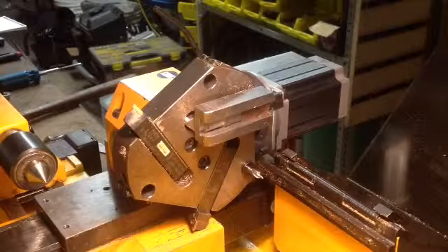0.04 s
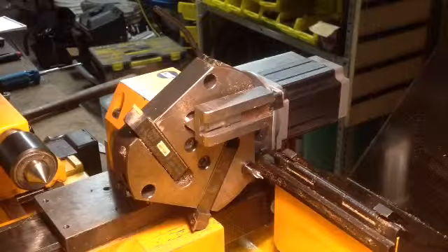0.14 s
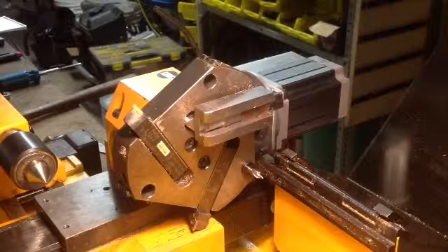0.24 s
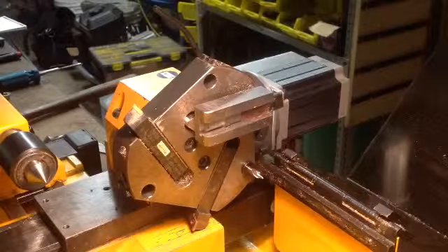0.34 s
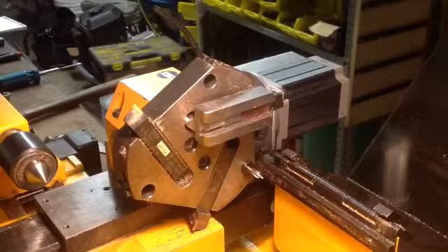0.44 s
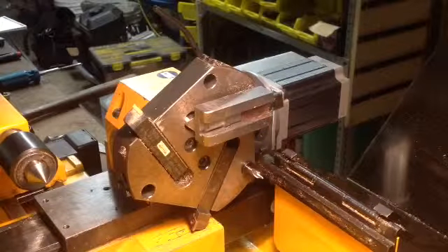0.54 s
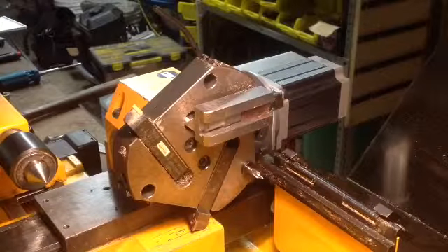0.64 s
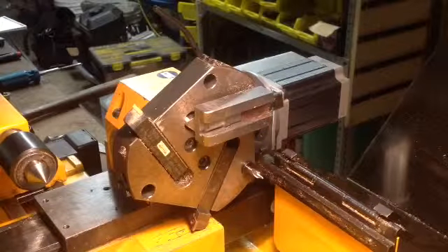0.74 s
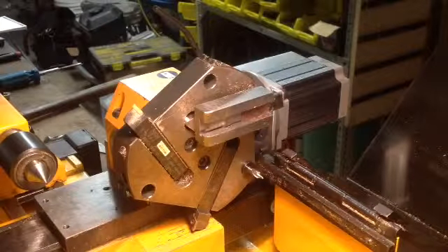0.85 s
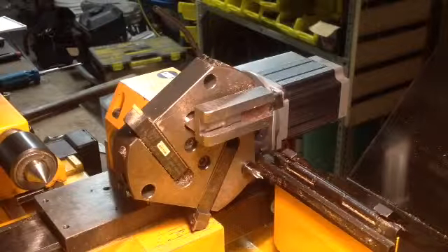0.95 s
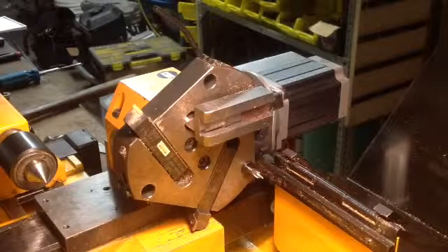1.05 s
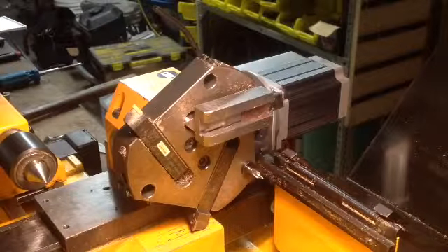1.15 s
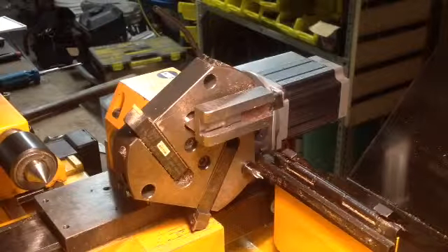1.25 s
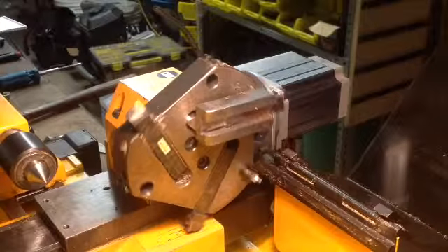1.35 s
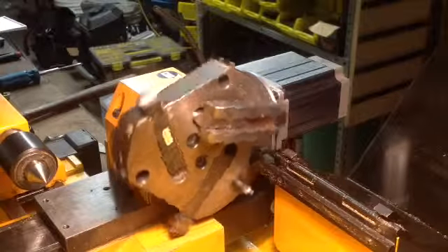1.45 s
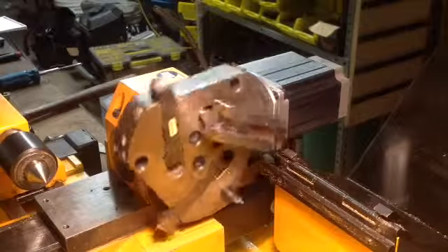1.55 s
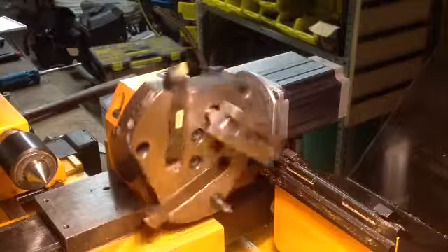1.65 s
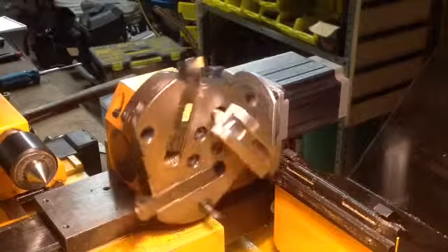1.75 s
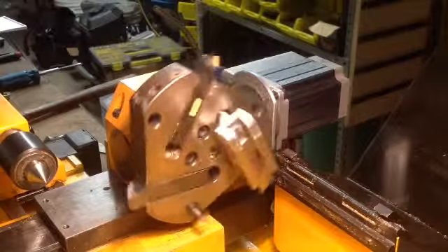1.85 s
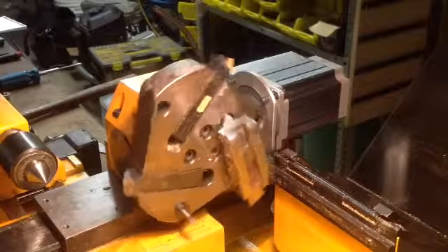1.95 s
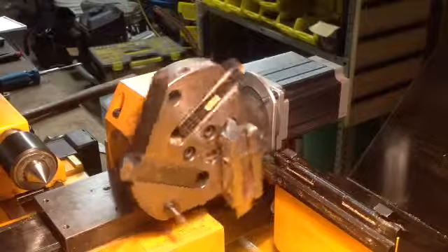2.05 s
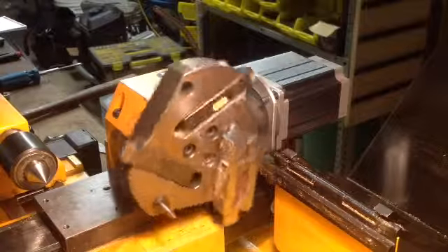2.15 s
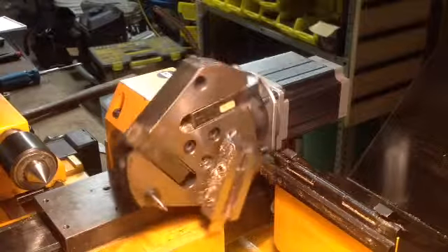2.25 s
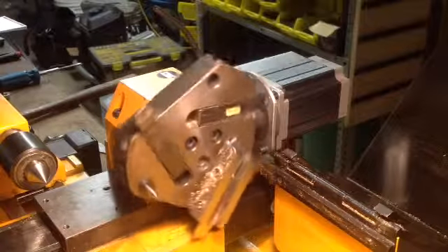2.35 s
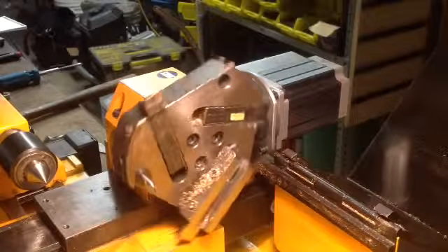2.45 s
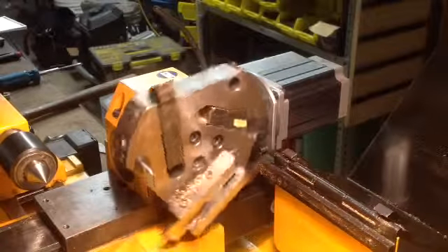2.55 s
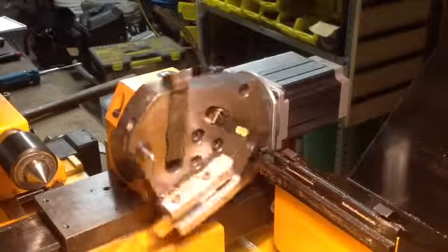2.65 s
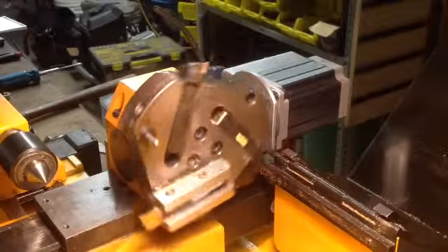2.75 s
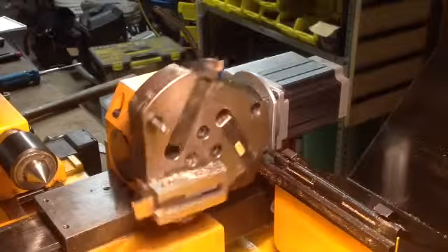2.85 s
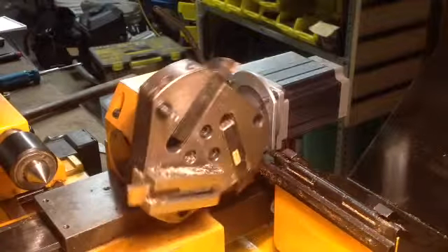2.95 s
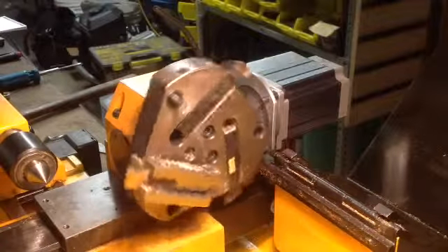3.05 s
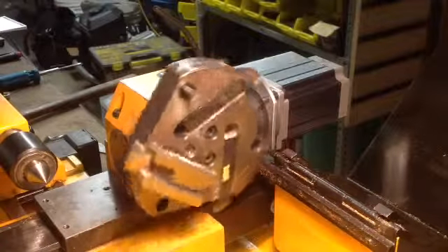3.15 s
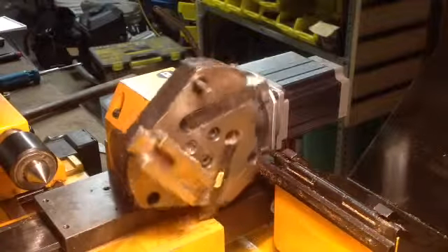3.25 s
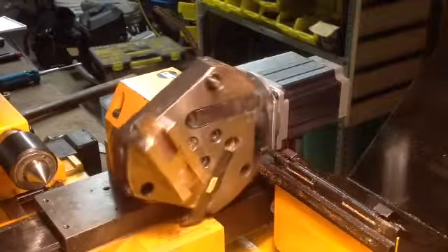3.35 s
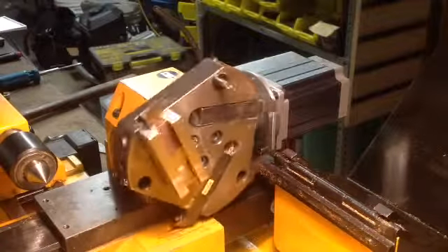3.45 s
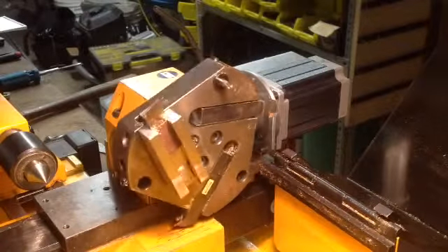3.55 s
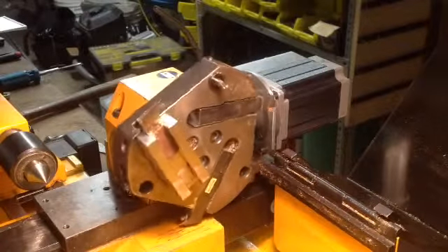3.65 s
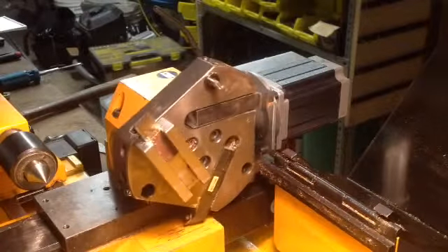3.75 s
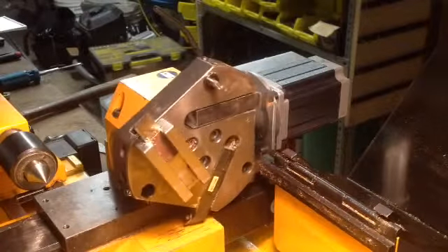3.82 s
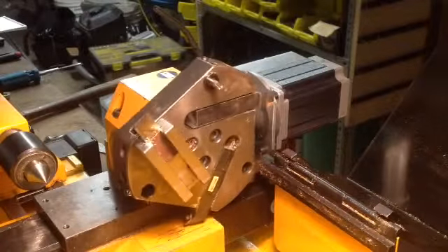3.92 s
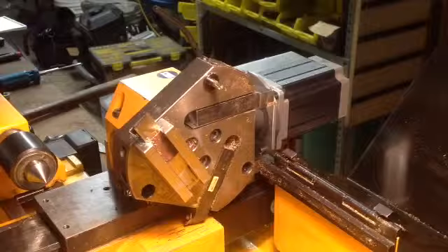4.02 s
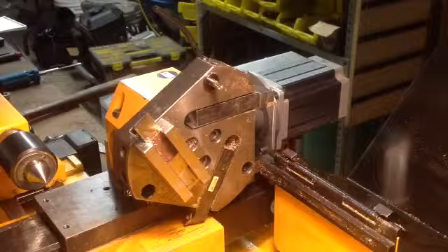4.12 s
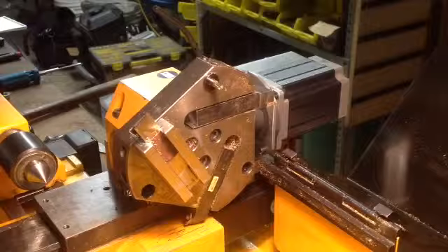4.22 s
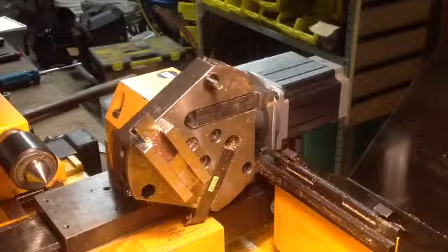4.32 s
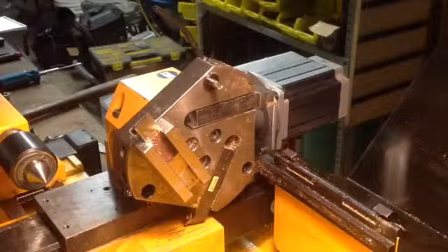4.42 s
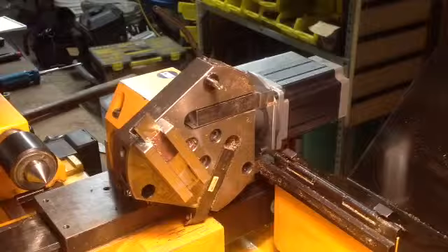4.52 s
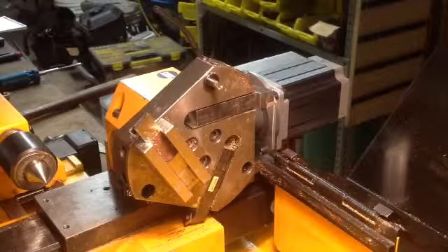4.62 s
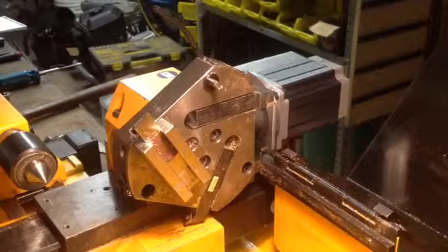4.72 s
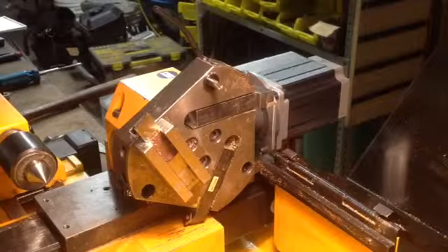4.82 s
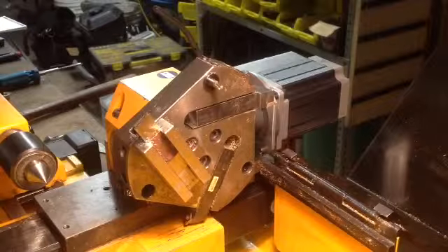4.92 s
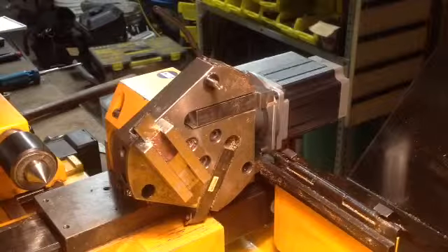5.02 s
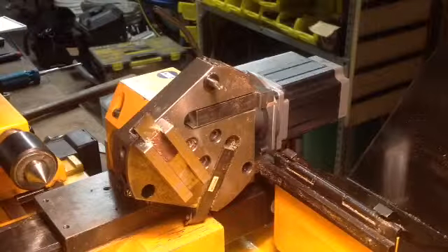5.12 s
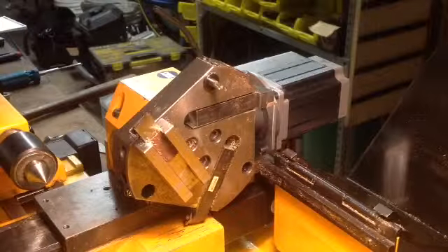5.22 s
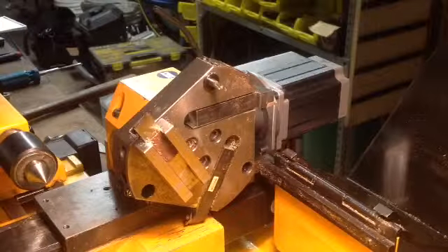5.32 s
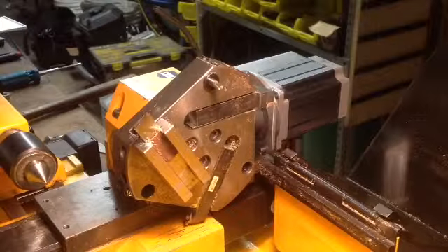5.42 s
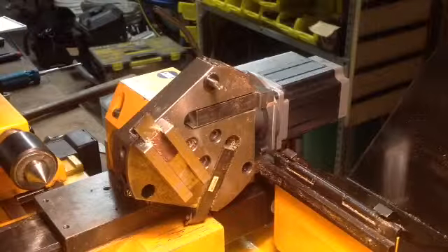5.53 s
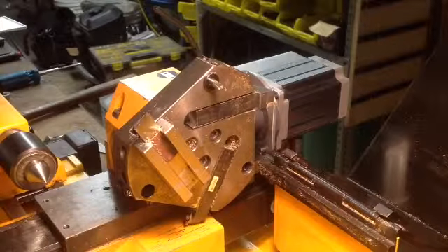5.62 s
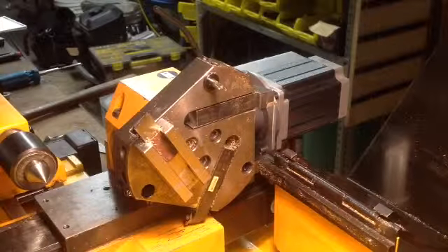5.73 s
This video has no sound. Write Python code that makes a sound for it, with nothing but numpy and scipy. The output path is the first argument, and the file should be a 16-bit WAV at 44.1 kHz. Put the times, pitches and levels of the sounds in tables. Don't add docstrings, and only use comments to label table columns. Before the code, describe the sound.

A steady cooling-fan hum, strongest around 500 Hz with soft airy noise, runs throughout a small workshop, heard close and fairly dry. Before the move there is a very faint high whistle and fizz from the idle motor driver, with tiny dry hand clicks at 0.3 to 0.65 s. At 1.27 s the turret starts with a small double knock and rattle; the motor sweeps up within 0.15 s to a steady whine near 2 kHz, with hiss and low gear rumble. Sharp, short steel ticks land at 1.84, 2.34, 2.86 and 3.36 s. The last begins braking: the whine falls, knocks mark the reversal near 3.5 s, and a lower 330 Hz hum creeps back. From 3.78 to 3.9 s it hits the pawl in a rapid, juddering metallic clunk with a loosening rattle. Afterwards fan hum and settling fizz remain, with faint clicks near 4.2, 4.4 and 5.25 s.

```python
import sys
import numpy as np
from scipy import signal
from scipy.fft import rfft, irfft, next_fast_len
from scipy.io import wavfile
from scipy.ndimage import uniform_filter1d, map_coordinates

SR = 44100
rng = np.random.default_rng(int(sys.argv[2]) if len(sys.argv) > 2 else 0)


def generate_wav(sig):
    pcm = np.round(np.clip(np.atleast_2d(sig).T, -1, 1) * 32767).astype(np.int16)
    wavfile.write(sys.argv[1], SR, pcm)


def elevation(decibels):
    levels = np.asarray(decibels, float)
    return 10 ** (levels / 20)


N = 254898

# time in seconds, rate in Hz.
STEP_RATE = [
    (1.25, 0),
    (1.42, 500.05),
    (3.358, 500.05),
    (3.526, 0),
    (3.574, -166.68),
    (3.815, -166.68),
    (3.885, -150),
    (3.897, 0),
]
# multiple of the step rate, level in dB, chopper beat level in dB.
FORWARD_TONES = [(4, -56, -77), (7, -78, -89), (11, -80, -86), (13, -78, -87), (14, -78, -88),
                 (15, -66, -83), (16, -77, -91), (17, -75, -74), (18, -75, -92), (19, -72, -80),
                 (20, -76, -86), (21, -72, -69), (22, -83, -85), (23, -73, -84), (24, -70, -87),
                 (25, -75, -83), (26, -67, -78), (27, -79, -79), (28, -72, -90), (29, -76, -89),
                 (30, -69, -76)]
# multiple of the step rate, level in dB, chopper beat level in dB.
BACK_TONES = [(2, -47, -79), (16, -58, -95), (22, -71, -79), (28, -68, -95), (34, -73, -86), (40, -68, -95),
              (42, -76, -87), (44, -75, -81), (45, -76, -88), (47, -73, -86), (54, -76, -95),
              (55, -76, -77), (57, -72, -72), (58, -76, -79), (63, -81, -74), (64, -72, -81),
              (66, -77, -95), (67, -77, -78), (69, -77, -78), (75, -77, -73), (76, -84, -72),
              (77, -88, -73), (78, -95, -64), (81, -86, -75), (86, -85, -75), (90, -77, -75)]
FORWARD_BEAT_HZ, BACK_BEAT_HZ = 87.5, 76
BRAKE_DB = -1
OVERSHOOT_DB, OVERSHOOT_S = 21, .1
CREEP_SMEAR_DB = 2
RAMP_JITTER = .17
# frequency in Hz, level in dB.
HOUSING_RADIATION = [(60, -50), (200, -16), (330, 0), (700, -10), (950, -2), (1150, -9), (1450, -1),
                     (1800, -6), (2000, 0)]
# time in seconds, dB over steady running.
ROTOR_STRAIN = [
    (1.262, -2),
    (1.272, 14),
    (1.42, 3),
    (1.55, -3.5),
    (3.36, -2),
    (3.53, 11.5),
    (3.62, 2),
    (3.8, 9),
    (3.87, 21.5),
    (3.9, 8),
]
SCRAPE_DB, HISS_DB, RUMBLE_DB = -65, -58, -52
HISS_GROWS, RUMBLE_GROWS = 0.21, 0.32
SLOW_HISS_DB = 3
SWAY_DB, SWAY_S, SWAY_TOP_S = 0.5, 1.88, 2.83
# frequency in Hz, width in Hz, level in dB.
COIL_HUMPS = [(5760, 5600, -2.5), (8760, 1000, -3), (10600, 2000, 6), (12950, 870, 8.5), (15100, 600, -1)]
# frequency in Hz, width in Hz, level in dB.
GEAR_HUMPS = [(332, 65, 4), (464, 100, -23)]
# frequency in Hz, width in Hz, level in dB.
BEARING_HUMPS = [(1456, 180, 2.5), (2360, 2100, -4.5), (2680, 560, -0.5), (5600, 400, -5)]
# first burst in seconds, spacing in seconds,
# first level in dB, change a burst in dB, burst length in seconds.
COIL_RATTLE = [
    (1.27, .04, -50, -4, 0.019),
    (3.416, 0.021, -53.5, -3, .025),
    (0.89, .015, -61, -1, .02),
    (3.826, 0.0175, -50.5, 0, 0.03),
]
RATTLE_BURSTS = 3

# time in seconds, peak in dB, lead of the first touch in seconds,
# touch relative to the snap in dB, share of the tip in dB.
TOOTH_SNAPS = [
    (1.838, -22.5, .002, -24, -12),
    (2.3385, -24.5, .0016, -10, -13),
    (2.8555, -25, .002, -7, -6),
    (3.355, -25.5, .0017, -5.5, -17),
]
TOUCH_PLATE_DB, SNAP_PLATE_DB = -1, -15
BOUNCE_S, BOUNCE_DB = 0.024, -25
# time in seconds, peak in dB, plate share in dB, tip share in dB.
PAWL_PRESSES = [
    (3.785, -41.5, 10, -14),
    (3.8349, -40, 7, -12),
    (3.8614, -41, -7, 5),
    (3.877, -34, -7, -1),
]
# frequency in Hz, level in dB, 60 dB decay in seconds.
STEEL_MODES = [(3344, -4, 0.016), (3740, -1, 0.02), (4180, -9, 0.021), (4610, -23, 0.041), (4640, 6, 0.01),
               (4740, -12, 0.054), (5125, -7, .05), (5960, -26, 0.032), (6320, -27, .035),
               (6860, -24, .025)]
# frequency in Hz, level in dB, 60 dB decay in seconds.
PLATE_MODES = [(1390, 1.5, 0.024), (1690, 2.5, 0.026), (2280, 0, 0.017), (2905, 0, 0.016),
               (3660, -4, 0.014)]
# frequency in Hz, width in Hz, level in dB.
SPLASH_HUMPS = [(2310, 680, -4), (4470, 1100, 2.5), (4700, 800, 1), (6160, 1200, -6)]
# frequency in Hz, width in Hz, level in dB.
TIP_HUMPS = [(7300, 540, 6.5), (8570, 900, 6.5), (10100, 590, 7.5), (13300, 1600, 0.5)]

# time in
# seconds, peak in dB.
CASTING_KNOCKS = [(1.269, -27), (1.279, -33), (1.296, -31), (1.322, -41), (3.4964, -32), (3.5265, -31),
                  (3.5326, -33), (3.545, -31), (3.776, -35), (3.7812, -29), (3.906, -39), (3.935, -38)]
KNOCK_CASE_DB, KNOCK_LID_DB = -10, -47
# time in seconds, base level in dB, case level in dB.
LOST_STEPS = [
    (3.8125, -28, -54),
    (3.8193, -38, -18.5),
    (3.824, -16, -43),
    (3.838, -26, -26.5),
    (3.85, -21.5, -26),
    (3.86, -15.5, -30),
    (3.871, -26, -27.5),
    (3.879, -19.5, -46),
    (3.8876, -17, -24.5),
]
LOST_LID_DB, LID_GROWS_DB_PER_S = -36, 82
# frequency in Hz, level in dB, 60 dB decay in seconds.
BASE_MODES = [(211, -10, 0.069), (289, 3, 0.046), (335, -1, 0.039)]
# frequency in Hz, level in dB, 60 dB decay in seconds.
CASE_MODES = [(510, 3.5, 0.051), (608, -4, 0.093)]
# frequency in Hz, level in dB, 60 dB decay in seconds.
LID_MODES = [(889, 0.5, 0.052), (1343, -12, 0.032), (1690, -13, 0.023)]
# frequency in Hz, width in Hz, level in dB.
BENCH_HUMPS = [(113, 39, -6.5), (189, 100, 1)]

# time in seconds, peak in dB, length in seconds.
HAND_CLICKS = [
    (0.288, -47, 0.013),
    (.345, -62, .006),
    (0.407, -64, .006),
    (.458, -54, .018),
    (.634, -50, 0.018),
    (3.95, -60, .012),
    (4.239, -56, 0.026),
    (4.41, -51, 0.015),
    (5.249, -48.5, 0.015),
    (5.405, -61, .012),
]
# frequency in Hz, level in dB per Hz.
CLICK_SPECTRUM = [(1500, -16), (4000, 3.5), (7000, 6.5), (12000, 5.5), (15500, 1)]
# frequency in Hz, 60 dB decay in seconds.
ROOM_DECAY = [(200, .4), (2000, 0.4), (6000, 0.24), (12000, 0.45)]

# start in seconds, end in seconds, whistle in dB, fizz in dB,
# extra fizz at first in dB.
HOLD_SPANS = [
    (0, 1.26, -65.5, -70.5, 2),
    (3.902, 5.78, -77, -71.5, 9),
]
# frequency in Hz, level in dB.
WHISTLE_TONES = [(10534.4, 0), (8316.6, -16), (4151, -13)]
SETTLE_S, WANDER_DB = 0.65, .8

# shaft order, ripple order, level in dB; the frequency is the sum of both multiples.
FAN_TONES = [(2, 0, -93), (0, 1, -76), (3, 0, -84), (1, 1, -82), (4, 0, -79), (-1, 2, -74), (0, 2, -59),
             (3, 1, -60), (6, 0, -60), (9, -1, -71), (-2, 3, -68), (1, 2, -66), (4, 1, -70), (5, 1, -68),
             (9, 0, -63), (11, 0, -73), (14, -1, -73), (12, 0, -43), (13, 0, -73), (14, 0, -74),
             (15, 0, -74), (18, 0, -62), (21, 0, -69), (24, 0, -68), (27, 0, -69), (33, 0, -74),
             (42, 0, -79), (48, 0, -80), (54, 0, -81)]
SHAFT_HZ, RIPPLE_HZ = 42.243, 120.1
# frequency in Hz, level in dB per Hz.
AIR_SPECTRUM = [(60, -34), (90, -21), (140, -10), (200, -3), (300, -0.5), (450, -1), (700, -0.5),
                (1000, -6.5), (1600, -8.5), (2600, -7.5), (4100, -10.5), (6000, -17), (9000, -22.5),
                (15000, -27.5)]
# frequency in Hz, width in Hz, level in dB.
CABINET_HUMPS = [(482, 70, 5.5), (778, 59, 2), (903, 22, 9.5), (1353, 145, 2), (4160, 100, 4)]


def unit(x):
    return x / np.sqrt(np.mean(x ** 2) + 1e-20)


def along(points, hz):
    f, v = np.transpose(points)
    return np.interp(np.log(hz + 1), np.log(f + 1), v)


def curve(rows, off):
    s, value = np.transpose(rows)
    return np.interp(np.arange(N) / SR, s, value, off, off)


def wobble(rate):
    knots = rng.standard_normal(int(N * rate / SR) + 4)
    return map_coordinates(knots, [np.arange(N) * rate / SR])


def noise(gain):
    m = next_fast_len(N)
    spectrum = rfft(rng.standard_normal(m)) * gain(np.fft.rfftfreq(m, 1 / SR))
    return unit(irfft(spectrum, m)[:N])


def humps(peaks, hz):
    power = 0
    for centre, width, db in peaks:
        detuning = (hz * hz - centre * centre) / (hz * width + 1)
        power = power + elevation(db) ** 2 / (1 + detuning ** 2) ** 2
    return np.sqrt(power)


def resonant_noise(peaks):
    return noise(lambda hz: humps(peaks, hz))


def tone(turns, db):
    return np.sqrt(2) * elevation(db) * np.sin(2 * np.pi * turns)


def ring(modes, rise, scatter_db):
    t = np.arange(SR // 4) / SR
    y = 0
    for hz, db, t60 in modes:
        y = y + elevation(db + rng.normal(0, scatter_db) - 60 * t / t60) * np.sin(2 * np.pi * hz * t)
    y = y * (1 - np.exp(-t / rise))
    return y / abs(y).max()


def add(track, s, sound):
    k = round(s * SR)
    track[k:k + len(sound)] += sound[:N - k]


def bursts(events):
    swell, t = np.zeros(N), np.arange(SR // 10) / SR
    for s, db, length in events:
        u = 4 * t / length
        add(swell, s - .002, elevation(db) * u * np.exp(1 - u))
    return swell


def stepper():
    rate = curve(STEP_RATE, 0)
    changing = uniform_filter1d(1. * (np.gradient(rate) != 0), size=300)
    turns = np.cumsum(abs(rate)) / SR + RAMP_JITTER / 4 * wobble(110) * changing
    return step_tones(rate, turns) + load_noise(rate) + gear_mesh(rate, turns)


def step_tones(rate, turns):
    t, out = np.arange(N) / SR, np.zeros(N)
    full_speed_s = STEP_RATE[1][0]
    overshoot_db = OVERSHOOT_DB * np.exp(-abs(t - full_speed_s - .035) / OVERSHOOT_S)
    runs = [(FORWARD_TONES, FORWARD_BEAT_HZ, rate.max()), (BACK_TONES, BACK_BEAT_HZ, rate.min())]
    for table, beat_hz, top in runs:
        back = top < 0
        speed = np.clip(rate / top, 0, 1)
        on = speed > 0
        braking = np.gradient(speed)[on] < 0
        stutter = elevation((4 * wobble(90)[on] + 1 + BRAKE_DB * braking) * (speed[on] < 1))
        for k, db, beat_db in table:
            housing_db = along(HOUSING_RADIATION, k * abs(rate[on])) - along(HOUSING_RADIATION, k * abs(top))
            ramp = stutter * elevation(housing_db) * speed[on] ** (max(k - 4, 0) / 3)
            flutter_db = 1.3 + back + (.7 + k / 25) * wobble(14)[on] - CREEP_SMEAR_DB * back * (k > 30)
            out[on] += ramp * tone(k * turns[on] + rng.random(), db + flutter_db)
            beat_turns = k * turns[on] + rng.random() + beat_hz * t[on]
            out[on] += ramp * tone(beat_turns, beat_db + flutter_db + (k == 4) * overshoot_db[on])
    return out


def load_noise(rate):
    t = np.arange(N) / SR
    strain_db = curve(ROTOR_STRAIN, -300)
    sway_db = SWAY_DB * np.cos(2 * np.pi * (t - SWAY_TOP_S) / SWAY_S)
    slowness = 1 - abs(rate) / rate.max()
    hiss_db = HISS_DB + HISS_GROWS * strain_db + SLOW_HISS_DB * slowness + sway_db
    slack_db = 4 * np.clip(rate / rate.min(), 0, 1)
    rumble_db = RUMBLE_DB + RUMBLE_GROWS * strain_db - slack_db
    rattle = []
    for s, gap, db, change_db, length in COIL_RATTLE:
        rattle += [(s + k * gap, db + k * change_db, length) for k in range(RATTLE_BURSTS)]
    hiss = (elevation(hiss_db - 1.5 + 1.6 * wobble(60)) + bursts(rattle)) * resonant_noise(COIL_HUMPS)
    rumble = elevation(rumble_db + 1.1 * wobble(24.36)) * resonant_noise(GEAR_HUMPS)
    scrape = elevation(SCRAPE_DB + strain_db + 2.0 * wobble(120)) * resonant_noise(BEARING_HUMPS)
    return hiss + rumble + scrape


def gear_mesh(rate, turns):
    t = np.arange(N) / SR
    level = elevation(-59 + 0.91 * wobble(10.3)) * np.clip(rate / rate.max(), 0, 1) ** 8
    line = tone(2 * turns - 5 * t + 0.21 * wobble(40), -2)
    return level * (line + 0.76 * resonant_noise([(996, 70, 0)]))


def pawl():
    out, splash, tip = np.zeros(N), np.zeros(N), np.zeros(N)
    t = np.arange(SR // 4) / SR
    rise = 1 - np.exp(-t / .0006)
    blows = []
    for s, db, lead, touch_db, tip_db in TOOTH_SNAPS:
        blows.append((s - lead, db + touch_db, TOUCH_PLATE_DB, tip_db))
        blows.append((s, db, SNAP_PLATE_DB, tip_db))
        blows.append((s + BOUNCE_S, db + BOUNCE_DB, SNAP_PLATE_DB, tip_db))
    for s, db, plate_db, tip_db in blows + PAWL_PRESSES:
        blow = rise * ring(STEEL_MODES, .0006, 1.5) + elevation(plate_db) * ring(PLATE_MODES, .0004, 1.5)
        add(out, s, elevation(db - 4.0) * blow)
        add(splash, s, rise * (elevation(db - 5.5 - 60 * t / 0.033) + elevation(db - 24.5 - 60 * t / 0.12)))
        add(tip, s, rise * elevation(db + tip_db - 3.5 - 60 * t / 0.025))
    return out + splash * resonant_noise(SPLASH_HUMPS) + tip * resonant_noise(TIP_HUMPS)


def body():
    out, shudder, t = np.zeros(N), np.zeros(N), np.arange(SR) / SR
    jolts = [(s, db, KNOCK_CASE_DB, KNOCK_LID_DB - db) for s, db in CASTING_KNOCKS]
    for s, db, case_db in LOST_STEPS:
        lid_db = LOST_LID_DB + LID_GROWS_DB_PER_S * (s - LOST_STEPS[0][0])
        jolts.append((s, db, case_db - db, lid_db - db))
    for s, db, case_db, lid_db in jolts:
        blow = ring(BASE_MODES, .0012, 1)
        blow = blow + elevation(case_db) * ring(CASE_MODES, .001, 1)
        blow = blow + elevation(lid_db) * ring(LID_MODES, .001, 1)
        add(out, s, elevation(db) * blow)
        add(shudder, s, elevation(db - 40.5 - 60 * t / 0.72) * (1 - np.exp(-t / .03)))
    small = signal.butter(4, 200, "high", fs=SR, output="sos")
    return signal.sosfilt(small, out) + shudder * resonant_noise(BENCH_HUMPS)


def clicks():
    crackle = elevation(2.4 * wobble(900))
    return bursts(HAND_CLICKS) * crackle * noise(lambda hz: elevation(along(CLICK_SPECTRUM, hz)))


def shop(x):
    hz, t, z = signal.stft(rng.standard_normal(SR // 2), SR, nperseg=256)
    decay = elevation(-60 * t / along(ROOM_DECAY, hz)[:, None])
    tail = signal.istft(z * decay, SR, nperseg=256)[1]
    late = np.pad(x, (200, 0))
    return signal.fftconvolve(late, tail / np.linalg.norm(tail))[:N]


def holding():
    t, out = np.arange(N) / SR, 0
    for start, end, whistle_db, fizz_db, extra_db in HOLD_SPANS:
        on = (t >= start) & (t <= end)
        whistle = sum(tone(hz * t, whistle_db + db) for hz, db in WHISTLE_TONES)
        whistle = elevation(.5 * WANDER_DB * wobble(5.7)) * whistle
        level_db = fizz_db + extra_db * np.exp(-abs(t - start) / SETTLE_S) + WANDER_DB * wobble(4.38)
        fizz = elevation(level_db) * resonant_noise([(13060, 540, 5), (12700, 60, 8)])
        out = out + on * (whistle + fizz)
    return out


def fan():
    t = np.arange(N) / SR
    shaft = SHAFT_HZ * t + .003 * wobble(.8)
    hum = 0
    for a, b, db in FAN_TONES:
        lag = (a * b != 0) / 4
        hum = hum + tone(a * shaft + b * RIPPLE_HZ * t + lag, db + 0.31 + 0.51 * wobble(12))
    air = noise(lambda hz: elevation(along(AIR_SPECTRUM, hz)) * np.hypot(1, humps(CABINET_HUMPS, hz)))
    return hum + elevation(-52.5 + wobble(5.45) / 2) * air


def scene():
    hits = pawl() + body() + clicks()
    return (hits + elevation(-12) * shop(hits) + stepper() + holding() + fan())[None]


def band_limit(x):
    return signal.sosfilt(signal.butter(12, 15710, fs=SR, output="sos"), x)


def record(dry):
    band = signal.ellip(8, .5, 40, 15450, fs=SR, output="sos")
    mix = signal.sosfilt(band, dry)
    return band_limit(mix)


dry = scene()
out = record(dry)
generate_wav(out)
```